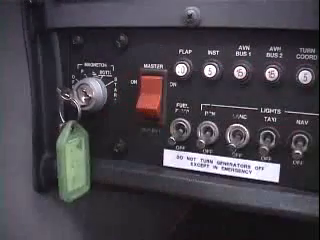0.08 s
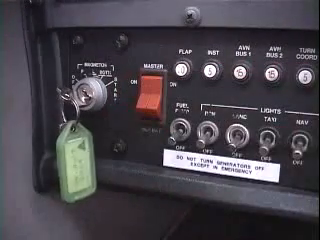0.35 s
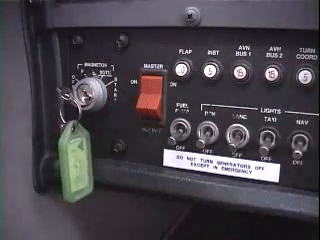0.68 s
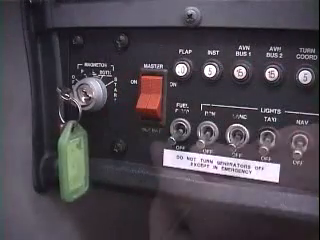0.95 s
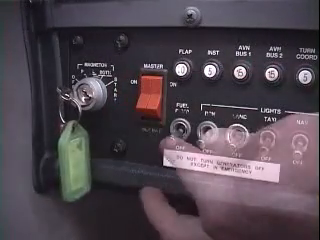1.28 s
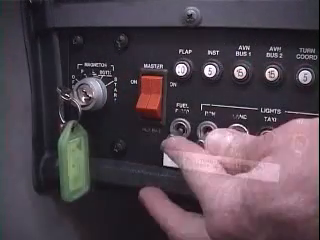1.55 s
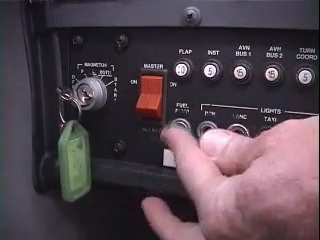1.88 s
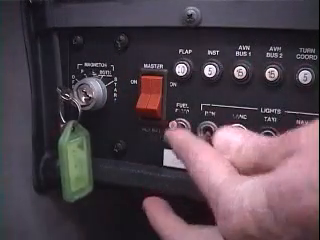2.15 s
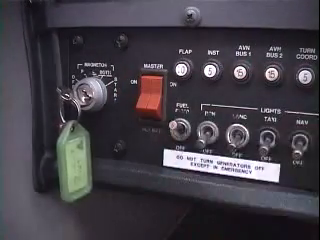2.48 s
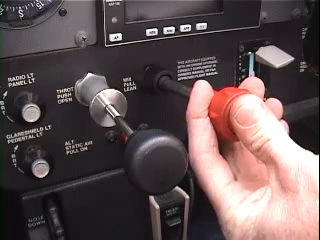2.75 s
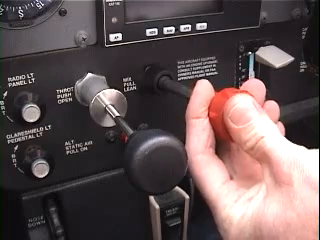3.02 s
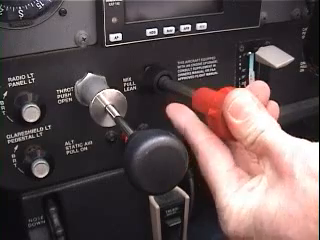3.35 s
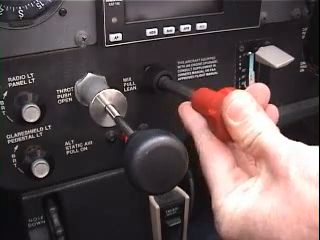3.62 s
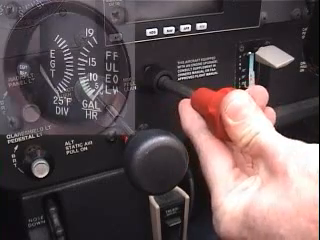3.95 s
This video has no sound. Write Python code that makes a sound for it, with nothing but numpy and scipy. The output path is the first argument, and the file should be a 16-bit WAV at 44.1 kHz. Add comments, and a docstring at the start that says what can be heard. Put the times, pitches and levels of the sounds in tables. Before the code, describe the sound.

An electric fuel pump starts with a sharp switch click, rattles as it rises in pitch, then whirs steadily. Beforehand, the close microphone catches light handling thuds, cloth friction and a faint electrical hum in a dry-sounding cockpit.

```python
"""In a small, acoustically dead aircraft cockpit, a 400 Hz electrical whine and a low hum sound throughout.
At first the close microphone is bumped and a sleeve brushes past, giving damped thuds and friction noise.
At 2 s a toggle switch snaps over, and its impacts excite the modes of the lever and the panel.
The electric fuel pump then spins up, rattling and rasping as its harmonics glide through the resonances
of its housing. From about 2.5 s it is primed and settles into a steady buzzing whir."""
import sys
import numpy as np
from scipy.fft import rfft, irfft, next_fast_len
from scipy.io import wavfile
from scipy.ndimage import map_coordinates

SR = 44100
rng = np.random.default_rng(int(sys.argv[2]) if len(sys.argv) > 2 else 0)


def put_to_file(sound):
    """Save the sound as 16-bit audio at rate SR, in the file named by the first command-line argument."""
    columns = np.atleast_2d(sound).T  # one column per channel
    safe = np.clip(columns, -1, 1)
    whole_steps = np.round(safe * 32767)
    wavfile.write(sys.argv[1], SR, whole_steps.astype(np.int16))


N = 176400

# stereo image: side over mid for noise, and left over right overall (f/Hz, level/dB)
STEREO_WIDTH = [(60, -9), (250, -13), (600, -7), (1300, -9), (3000, -6), (8000, -3)]
STEREO_BALANCE = [(60, -4.5), (110, -4), (350, -2.5), (1300, -1.5), (2000, -.8), (3400, .5), (11000, .5)]
# spectrum of the cabin air (f/Hz, level/dB)
AIR_SPECTRUM = [(25, -6), (70, -5.5), (130, 2), (250, -8), (500, -11), (1200, -13.5), (3000, -15.5),
                (8000, -22.5), (11500, -30)]
# partials of the whine (harmonic number, level/dB)
WHINE_HARMONICS = [(2, -58.5), (3, -68.5), (4, -55.5), (5, -74), (6, -50.5), (7, -60), (8, -46.5),
                   (9, -65.5)]
# gain of its partials above the fifth (t/s, level/dB)
WHINE_TREBLE_GAIN = [(.7, -2), (1.25, -2.5), (1.45, -4)]
# brief dips of single partials (harmonic number, t/s, depth/dB)
WHINE_DIPS = [(4, 0.915, 21), (6, 0.85, 12), (8, 0.96, 9)]

# bumps on the microphone (t/s, level/dB, T60/s, thud gain/dB, scuff gain/dB, thud f/Hz)
BUMP_EVENTS = [(.004, -38, 0.15, -1.5, 0.5, 141), (0.113, -34.5, 0.049, -1.5, -3.5, 150),
               (.243, -33.5, 0.064, -4, -5, 300), (.395, -44, 0.42, -8, -3, 280),
               (.596, -44, 0.12, 10.5, -13, 135), (0.649, -38, 0.14, -10, -10, 119),
               (.724, -24.5, 0.1, -8.5, -4, 173), (.744, -25.5, 0.097, -5.5, -30, 117),
               (0.871, -36.5, .097, -8, -24, 159), (.887, -41.5, 0.18, 5, -8, 128.5),
               (1.052, -36, 0.076, -6, 7, 297), (1.06, -48.5, 0.092, 10.5, -12, 131),
               (1.142, -41, 0.083, 6.5, 10, 260), (1.152, -36.5, 0.068, -18, 7, 260),
               (1.163, -32.5, 0.1, -2.5, -9, 287), (1.348, -51, .044, -10, 17, 200),
               (1.642, -40.5, .077, -11, 2, 298), (2.82, -42.5, .2, 7, -10, 151),
               (2.981, -33.5, 0.25, -11, -2, 161), (3.061, -32.5, .22, -21, -2, 310)]
# spectra of a bump's knock and scuff, and of the sleeve (f/Hz, level/dB)
KNOCK_SPECTRUM = [(100, 0.5), (400, 6), (700, -4.5), (1200, 2.5), (1700, -4), (2600, -35), (5000, -27),
                  (11000, -42)]
SCUFF_SPECTRUM = [(500, -38), (2400, 0.5), (4500, -4.5), (8000, -6), (11500, -17.5)]
SLEEVE_SPECTRUM = [(100, 6), (500, -5.5), (1200, 0.5), (2500, -2.5), (4500, -5), (8000, -7.5), (11500, -22)]
# strokes of the sleeve (onset t/s, duration/s, level/dB)
SLEEVE_STROKES = [(0.225, 0.407, -48.5), (1.163, 0.19, -46.5), (1.54, 0.11, -53)]

# impacts in the switch (t/s, level/dB, T60/s, ring gain/dB, crack gain/dB)
SWITCH_CONTACTS = [(2.0298, -14.5, 0.05, 5.5, -0.5), (2.038, -19.5, 0.035, 4, -2),
                   (2.0432, -13.5, 0.036, -5, 8), (2.0487, -18, 0.04, -17, -1),
                   (2.0496, -24.5, 0.11, -10, 5)]
# modes of the sprung lever and of the panel (f/Hz, level/dB, T60/s)
LEVER_MODES = [(2093, -3, 0.12), (4110, 4.5, 0.022), (4890, 4, 0.031), (6080, 3.5, .03), (6500, 2, .02),
               (7480, 3, 0.023)]
PANEL_MODES = [(145, -31.5, 0.42), (345, -24.5, 0.35), (640, -18, 0.13)]
# spectra of the panel's knock and the contact's crack (f/Hz, level/dB)
PANEL_SPECTRUM = [(40, -11), (150, -6), (350, -1), (650, 0), (1200, -4), (2200, -3), (3200, -7), (5500, -7),
                  (9000, -13), (11500, -19)]
CRACK_SPECTRUM = [(500, -10), (3000, -8.5), (6500, -9), (8900, -3.5), (10500, -7.5), (11600, -19.5)]

# spectra of the pump's rattle, rasp and brush noise (f/Hz, level/dB)
RATTLE_SPECTRUM = [(80, -16), (180, -4), (380, 0), (700, -5.5), (1000, 9.5), (1400, 3), (1750, 9.5),
                   (2400, -3), (3000, -14), (3800, -17), (10000, -14)]
RASP_SPECTRUM = [(1500, -22), (2100, -4), (2450, -7), (2800, 9), (3400, -17), (6000, -24)]
BRUSH_SPECTRUM = [(60, -27.5), (200, -18), (330, -17.5), (560, -20), (760, -8), (1100, -6.5), (1350, 0),
                  (1700, -1), (1850, -12), (2150, -3.5), (2520, -14), (2920, -9), (3500, -15), (8400, -16),
                  (9500, -28), (10600, -18), (11400, -27)]
# envelopes of the rattle and of the tone before and after priming (t/s, level/dB)
RATTLE_ENVELOPE = [(2.05, -29), (2.09, -25.5), (2.16, -22.5), (2.21, -26), (2.25, -26), (2.3, -31),
                   (2.4, -37), (2.7, -59)]
UNPRIMED_ENVELOPE = [(2.05, -46), (2.11, -32), (2.14, -30), (2.18, -23), (2.21, -24), (2.25, -21),
                     (2.3, -25), (2.36, -22.5), (2.5, -22)]
PRIMED_ENVELOPE = [(2.47, -22), (2.55, -20), (2.74, -18), (3.1, -18.8), (3.7, -19.5), (4, -19)]
# resonant response of the housing before priming (f/Hz, level/dB)
HOUSING_RESPONSE = [(200, -32), (390, -14), (500, -28), (640, -16), (740, -27), (930, -9), (1080, -10),
                    (1180, -16), (1320, 0), (1500, -5), (1620, -13), (1710, -4), (1890, -19), (2080, -8),
                    (2290, -10), (2600, -26), (3000, -17), (3500, -24), (8000, -31), (11000, -41)]
# main partials of the primed pump (multiple of the shaft rate, level/dB)
PUMP_HARMONICS = [(2, -40), (3, -31), (4, -22), (5, -28), (6, -26), (7, -32), (8, -10), (9, -19),
                  (10, -24.5), (11, -22), (12, 0), (13, -12.5), (14, -8), (15, -10), (16, -12), (17, -17.5),
                  (18, -18), (19, -13), (20, -20), (21, -27), (22, -26.5), (23, -23), (24, -26), (25, -15),
                  (27, -21), (28, -26), (32, -24), (35, -24), (36, -15.5), (40, -25.5), (47, -21),
                  (48, -24), (54, -24), (56, -23), (65, -25)]
# spectral envelope of its remaining partials (f/Hz, level/dB)
BUZZ_SPECTRUM = [(3400, -29), (4600, -34.5), (8400, -32.5), (9400, -43), (10600, -37), (11400, -50)]
# resonances of the pump's metal (f/Hz)
METAL_HZ = [2950, 3950, 5280, 6200, 7300, 8250]

PUMP_START_S, FULL_SPEED_HZ = 2.05, 110.68


def amp(db):
    """Amplitude ratio: tenfold for every 20 dB."""
    return 10 ** (np.asarray(db) / 20)


def along(points, hz):
    """Interpolation of a spectrum on a logarithmic frequency axis."""
    f, db = np.transpose(points)
    return np.interp(np.log(hz + 1), np.log(f + 1), db)


def clock():
    """Uniform sampling: the time of each sample in seconds."""
    return np.arange(N) / SR


def curve(points):
    """Linear interpolation of an envelope in time."""
    return np.interp(clock(), *np.transpose(points))


def wobble(rate):
    """Smooth random modulation: a spline through `rate` Gaussian values a second."""
    knots = rng.standard_normal(8192)
    return map_coordinates(knots, [clock() * rate + 2], mode="wrap")


def filtered(x, response):
    """Linear filtering: the spectrum is multiplied by a frequency response."""
    size = next_fast_len(N + SR // 2)
    return irfft(rfft(x, size) * response(np.fft.rfftfreq(size, 1 / SR)), size)[..., :N]


def noise(spectrum, gate=1):
    """Partial coherence: gated, coloured mid and side noise form a stereo pair of unit rms."""
    def response(hz):
        mid_db = along(spectrum, hz)
        return amp([mid_db, mid_db + along(STEREO_WIDTH, hz)])
    mid, side = filtered(gate * rng.standard_normal((2, N)), response)
    pair = np.array([mid + side, mid - side])
    return pair / np.sqrt(np.mean(pair ** 2) + 1e-20)


def strike(onset, attack_s, t60):
    """Exponential damping: after a quick rise the envelope falls 60 dB in t60 seconds."""
    age = np.maximum(clock() - onset, 0)
    return (1 - np.exp(-age / attack_s)) * np.exp(-np.log(1000) * age / t60)


def ringing(modes, onset, attack_s):
    """Modal superposition: a struck body vibrates as a sum of damped sinusoids."""
    return sum(amp(db) * strike(onset, attack_s, t60) * np.sin(2 * np.pi * (hz * clock() + rng.random()))
               for hz, db, t60 in modes)


def background(whine_hz=400.7, dip_s=0.046, hum_hz=65.5, hum_db=-51, air_db=-50.5):
    """Line spectrum over a continuum: a wavering electrical whine and a hum above faint air noise."""
    t, whine = clock(), np.zeros(N)
    phase = 2 * np.pi * np.cumsum(whine_hz + 0.19 * wobble(3.99)) / SR
    treble_db = curve(WHINE_TREBLE_GAIN)
    for k, db in WHINE_HARMONICS:
        dip_db = sum(depth * np.exp(-((t - s) / dip_s) ** 2) for line, s, depth in WHINE_DIPS if line == k)
        gain = amp(db + (k > 5) * treble_db - dip_db + 1.2 * wobble(6.37))
        whine += gain * np.sin(k * phase + 2 * np.pi * rng.random())
    hum = amp(hum_db + wobble(8.8)) * np.sin(2 * np.pi * hum_hz * t + 0.27 * wobble(8.0))
    return np.sqrt(2) * (whine + hum) + amp(air_db) * noise(AIR_SPECTRUM)


def bumps(thud_stretch=1.47, grit_db=2.5):
    """Impact excitation: each soft blow gives a knock, a gritty scuff and a low damped thud."""
    t, out = clock(), np.zeros((2, N))
    knock, scuff = noise(KNOCK_SPECTRUM), noise(SCUFF_SPECTRUM, amp(grit_db * wobble(900)))
    waver = 1.03 * wobble(110)
    for onset, db, t60, thud_db, scuff_db, thud_hz in BUMP_EVENTS:
        tone = np.sqrt(2) * np.sin(2 * np.pi * thud_hz * (t - onset) + waver)
        thud = tone * strike(onset, 0.0028, t60 * thud_stretch)
        contact = strike(onset, 0.0021, t60) * (knock + amp(scuff_db) * scuff)
        out += amp(db) * (contact + amp(thud_db) * thud)
    return out


def sleeve(ramp_s=0.032):
    """Sliding friction: cloth gives broadband noise for the length of each stroke."""
    t = clock()
    cloth = noise(SLEEVE_SPECTRUM) * amp(1.2 * wobble(40.4))
    return sum(amp(db) * cloth * np.clip(np.minimum(t - onset, onset + length - t) / ramp_s, 0, 1)
               for onset, length, db in SLEEVE_STROKES)


def switch():
    """Free vibration: each contact rings the lever and knocks the panel, which booms at the slam."""
    out = np.zeros((2, N))
    panel, crack = noise(PANEL_SPECTRUM), noise(CRACK_SPECTRUM)
    for onset, db, t60, ring_db, crack_db in SWITCH_CONTACTS:
        click = strike(onset, 0.00025, t60) * (panel + amp(crack_db) * crack)
        ring = .5 * amp(ring_db) * ringing(LEVER_MODES, onset, .0001)
        out += amp(db) * (click + ring)
    slam_s = SWITCH_CONTACTS[2][0]
    return out + ringing(PANEL_MODES, slam_s, 0.0027)


def shaft(deficit_hz=61, time_constant_s=.115):
    """First-order response: the shaft nears full speed exponentially; its angle integrates the speed."""
    age = np.maximum(clock() - PUMP_START_S, 0)
    hz = FULL_SPEED_HZ - deficit_hz * np.exp(-age / time_constant_s)
    return hz, 2 * np.pi * np.cumsum(hz + 0.0368 * wobble(25.02)) / SR


def metal_db(hz, width_hz=210, peak_db=6):
    """Resonance: the pump's metal lifts the level near each of its natural frequencies."""
    return sum(peak_db * np.exp(-((hz - centre) / width_hz) ** 2) for centre in METAL_HZ)


def pump_rasp():
    """A transient: one damped burst of noise as the pump catches."""
    return amp(-21) * noise(RASP_SPECTRUM) * strike(onset=2.143, attack_s=0.0032, t60=0.2)


def pump_tone(shaft_hz, angle, primed_s=2.49, priming_s=0.03, growl_db=8, spread_db=2, flutter_db=.6):
    """Harmonic series of one beat a turn: it glides through the housing's resonances, then steadies."""
    t, tone = clock(), np.zeros((2, N))
    step = SR // 200  # samples between updates of the levels
    ticks = t[::step]
    primed = .5 + .5 * np.tanh((ticks - primed_s) / priming_s / 2)
    load = np.abs(1 - shaft_hz / FULL_SPEED_HZ)
    rough_angle = angle + (0.05 * load + .001) * wobble(260)
    harmonic_db = dict(map(tuple, PUMP_HARMONICS))
    start_db, run_db = curve(UNPRIMED_ENVELOPE)[::step], curve(PRIMED_ENVELOPE)[::step]
    for k in range(2, 104):
        hz = k * shaft_hz[::step]
        buzz_db = along(BUZZ_SPECTRUM, hz) + metal_db(hz) + spread_db * rng.standard_normal()
        primed_db = run_db + harmonic_db.get(k, buzz_db)
        growl = growl_db * load[::step] * (k * FULL_SPEED_HZ < 750)  # load lifts the low harmonics
        unprimed_db = start_db + along(HOUSING_RESPONSE, hz) + .5 * metal_db(hz) + growl
        flutter = flutter_db * np.interp(ticks, np.linspace(0, t[-1], 40), rng.standard_normal(40))
        gain = amp(primed * primed_db + (1 - primed) * unprimed_db + flutter)
        scatter = .065 * rng.standard_normal()
        stereo_shift = .014 * rng.standard_normal() * np.array([[1], [-1]])
        phase = k * (scatter + stereo_shift) + .09 * k ** 2  # square term: dispersion in the housing
        tone += np.interp(t, ticks, gain) * np.sin(k * rough_angle + phase)
    return np.sqrt(2) * tone * (t > PUMP_START_S)


def pump(drone_db=-34.0, brush_depth=0.19, catch_s=2.125, catch_rise_s=0.0094):
    """Rotational modulation: over tone and drone, brush noise pulses once a turn, the rattle twice."""
    hz, angle = shaft()
    fade_in = strike(PUMP_START_S, 0.024, np.inf)
    drone = np.sqrt(2) * np.sin(angle) * amp(drone_db) * (hz / FULL_SPEED_HZ) ** 6
    catch_swell = 0.83 + 0.57 * np.tanh((clock() - catch_s) / catch_rise_s)
    brushes = noise(BRUSH_SPECTRUM, 1 + brush_depth * np.cos(angle)) * amp(-31.5) * catch_swell
    brushes = filtered(brushes, lambda f: amp(metal_db(f)))
    rattle_pulses = amp(1.6 * np.cos(2 * angle) + 0.98 * wobble(300))
    rattle = noise(RATTLE_SPECTRUM, rattle_pulses) * amp(curve(RATTLE_ENVELOPE))
    return pump_tone(hz, angle) + fade_in * (drone + brushes + rattle)


def scene():
    """Superposition: all sources add, and a level difference places the bass to the right."""
    mix = pump() + pump_rasp() + switch() + bumps() + sleeve() + background()
    return filtered(mix, lambda hz: amp(np.outer([.5, -.5], along(STEREO_BALANCE, hz))))


def record(dry, cutoff_hz=11480):
    """Saturation and band limiting: peaks flatten at full scale, then the top treble is removed."""
    return filtered(np.clip(dry, -1, 1), lambda hz: hz < cutoff_hz)


dry = scene()
out = record(dry)
put_to_file(out)
```